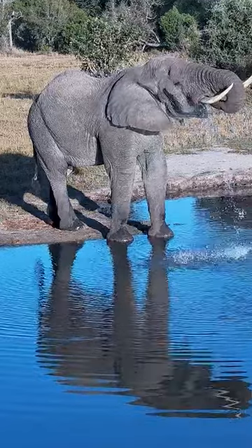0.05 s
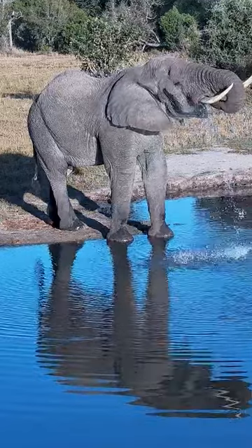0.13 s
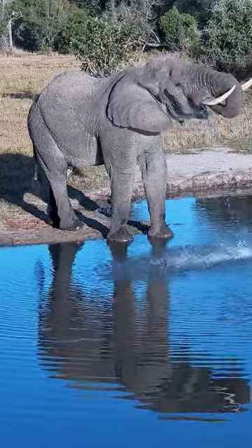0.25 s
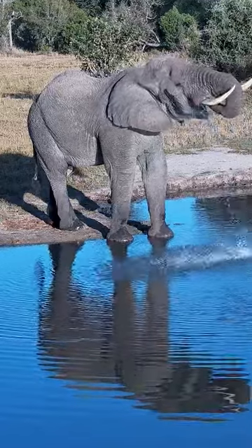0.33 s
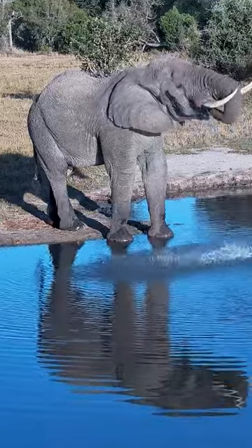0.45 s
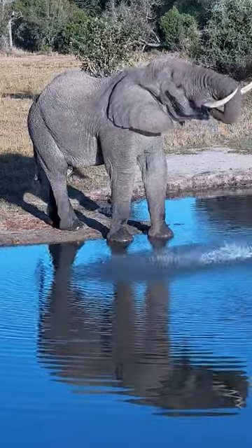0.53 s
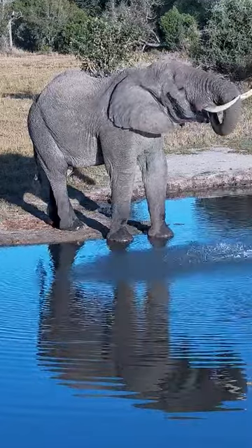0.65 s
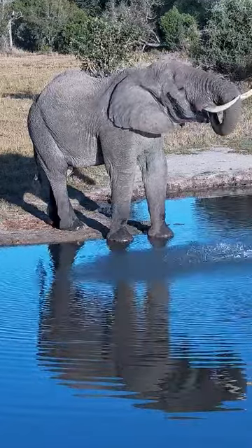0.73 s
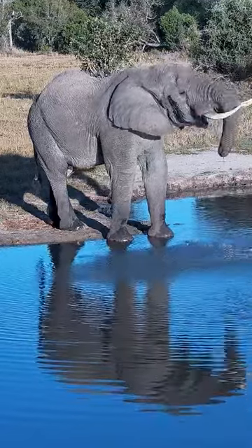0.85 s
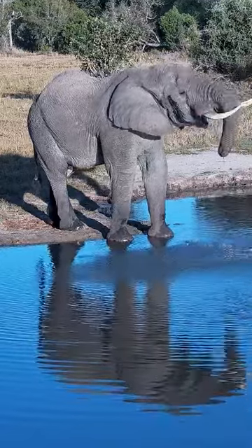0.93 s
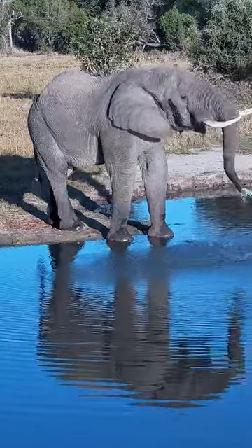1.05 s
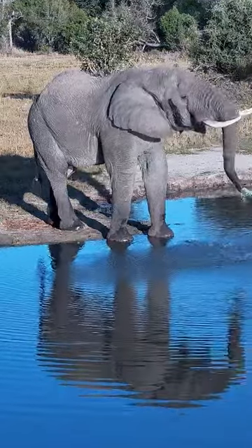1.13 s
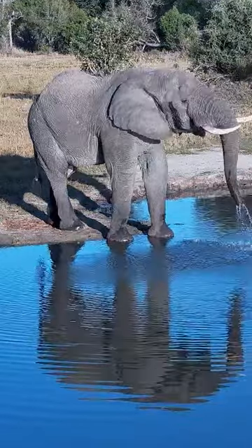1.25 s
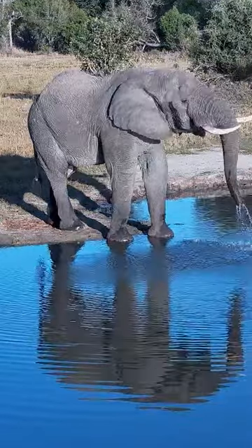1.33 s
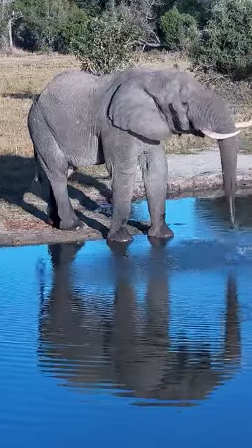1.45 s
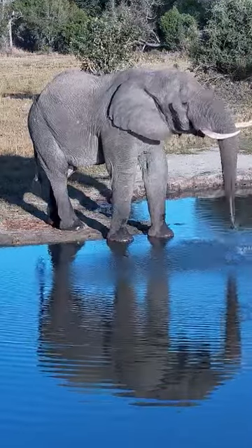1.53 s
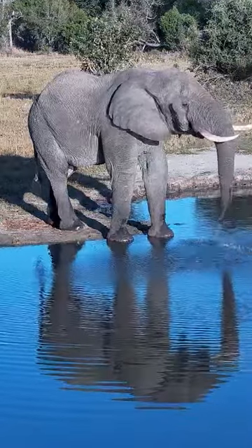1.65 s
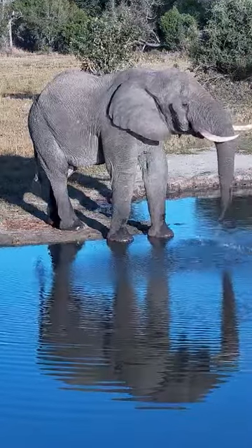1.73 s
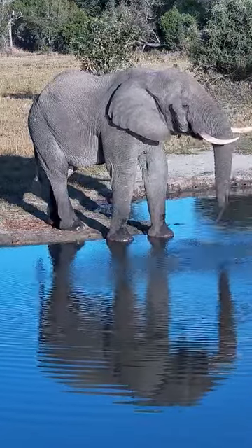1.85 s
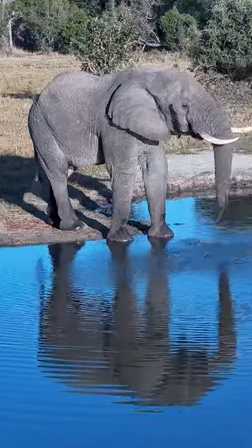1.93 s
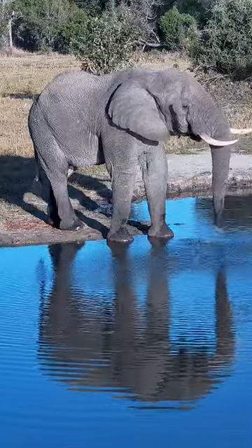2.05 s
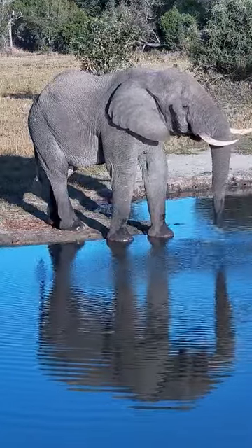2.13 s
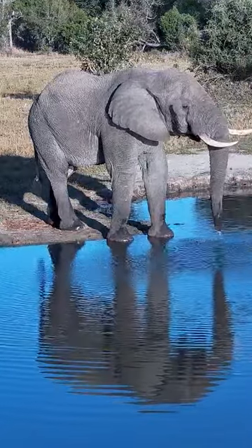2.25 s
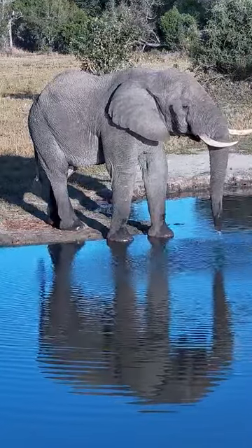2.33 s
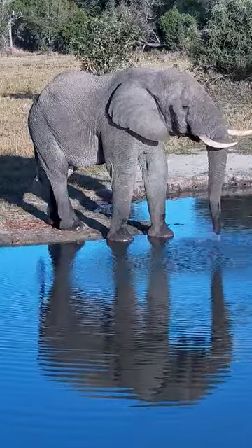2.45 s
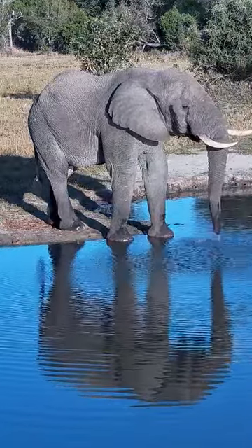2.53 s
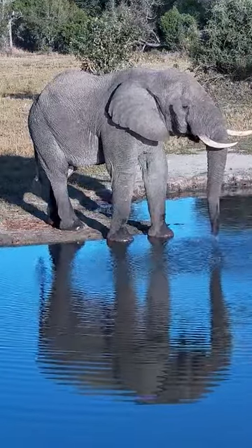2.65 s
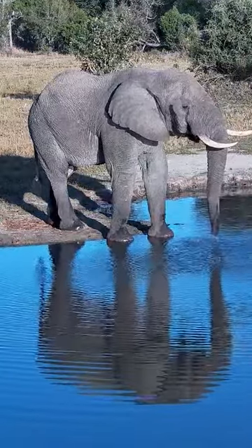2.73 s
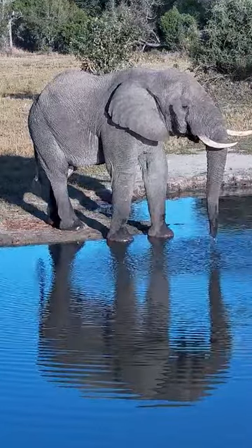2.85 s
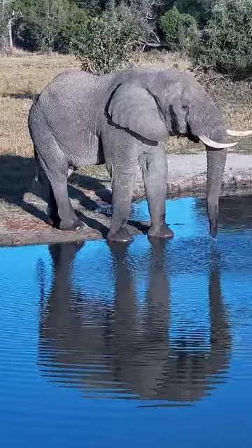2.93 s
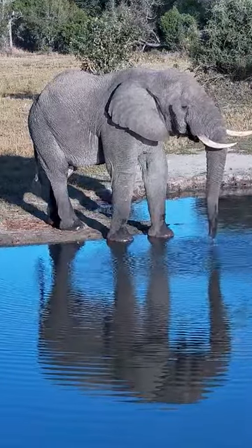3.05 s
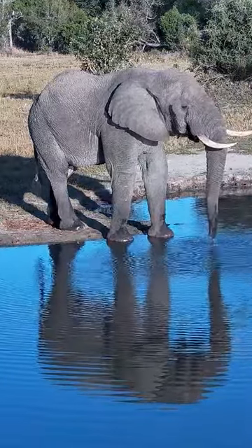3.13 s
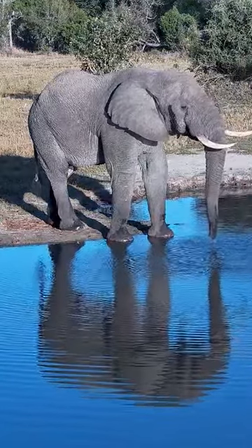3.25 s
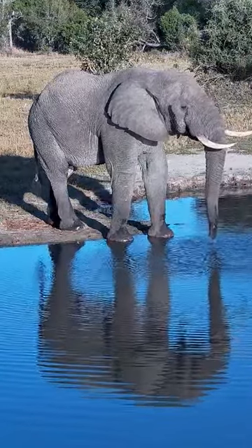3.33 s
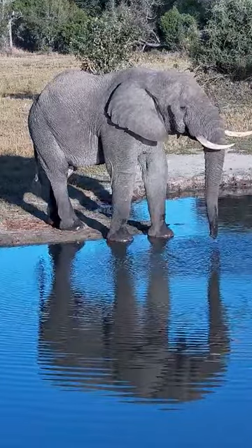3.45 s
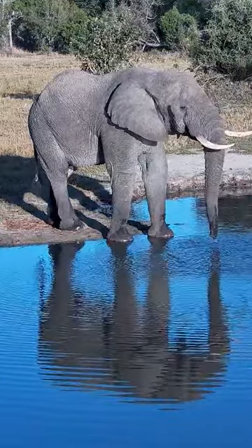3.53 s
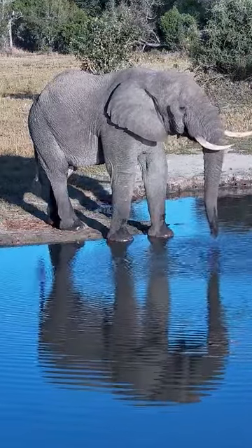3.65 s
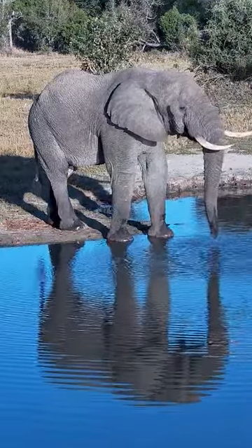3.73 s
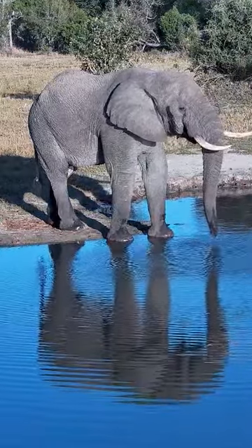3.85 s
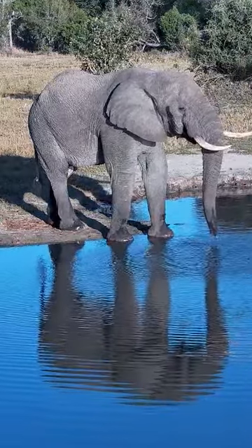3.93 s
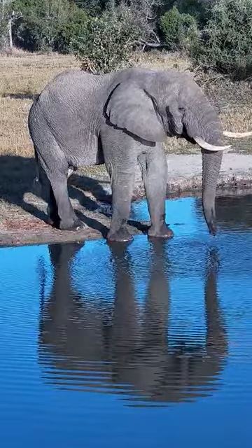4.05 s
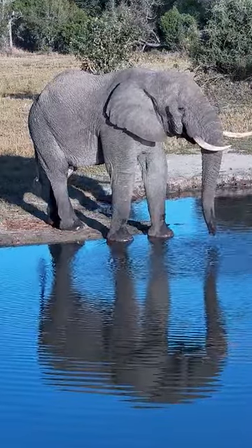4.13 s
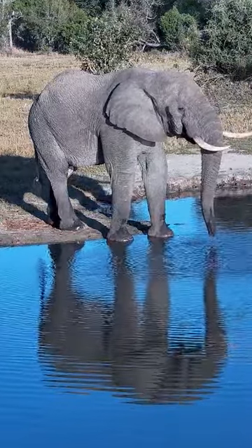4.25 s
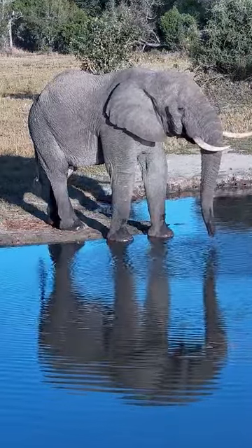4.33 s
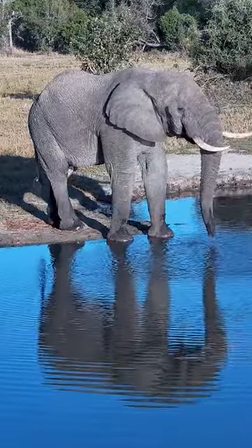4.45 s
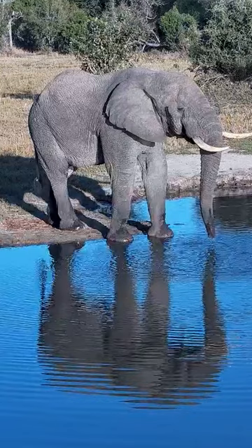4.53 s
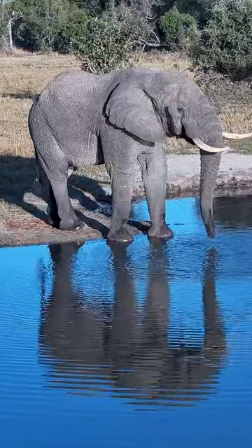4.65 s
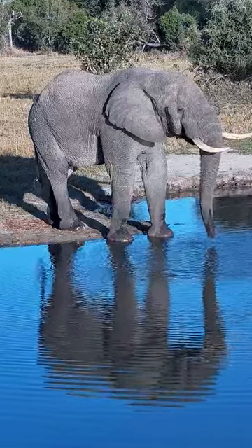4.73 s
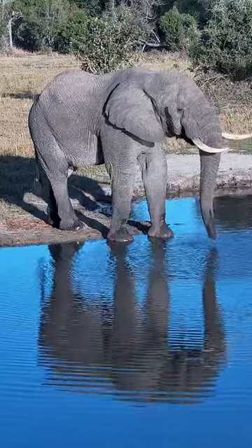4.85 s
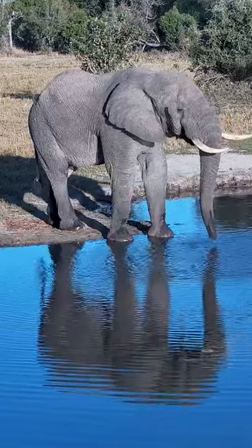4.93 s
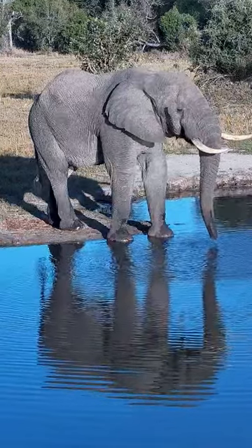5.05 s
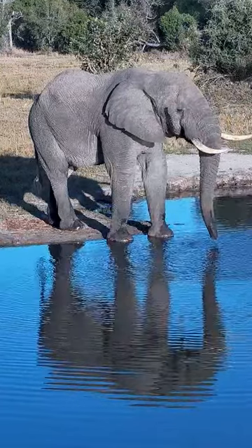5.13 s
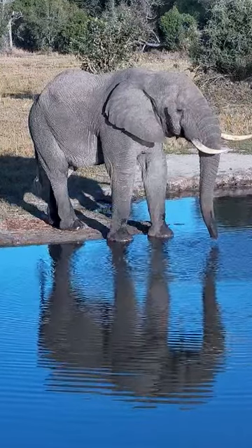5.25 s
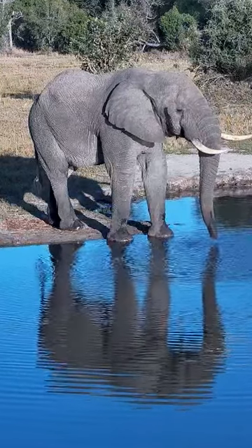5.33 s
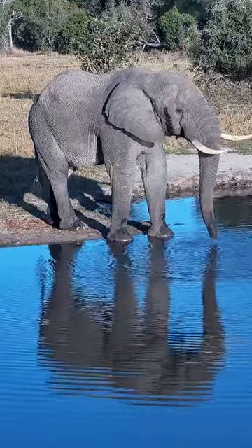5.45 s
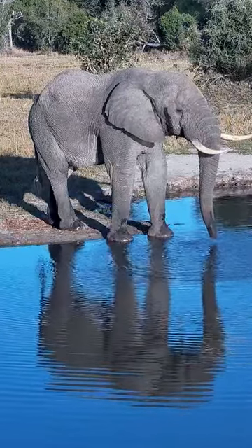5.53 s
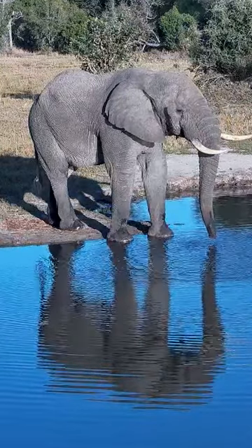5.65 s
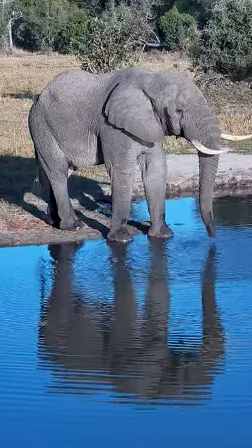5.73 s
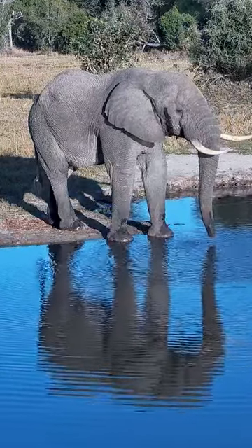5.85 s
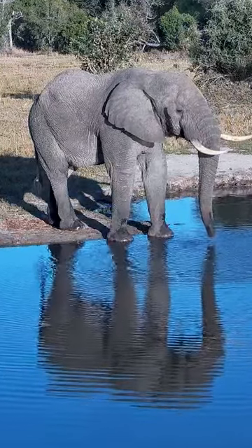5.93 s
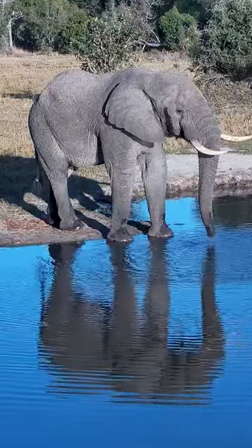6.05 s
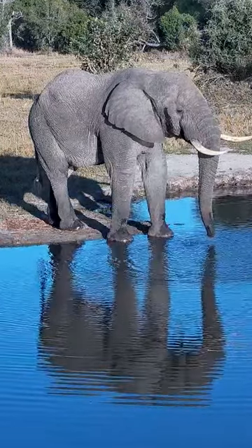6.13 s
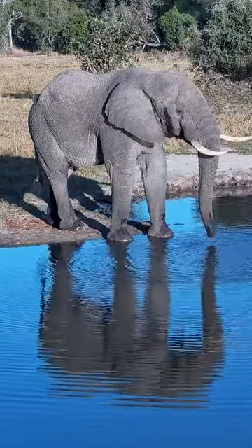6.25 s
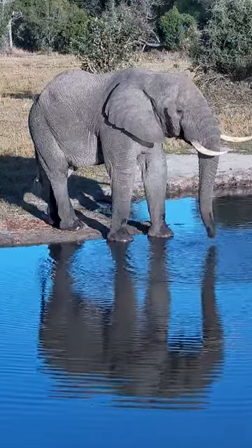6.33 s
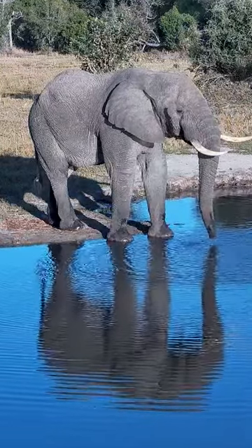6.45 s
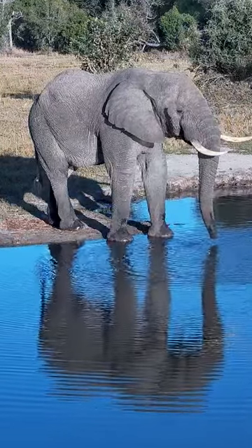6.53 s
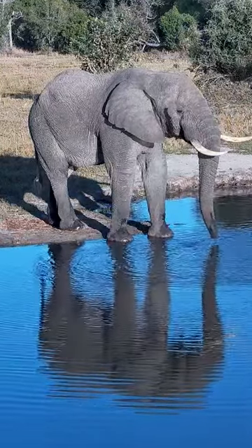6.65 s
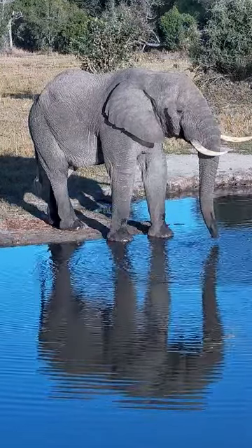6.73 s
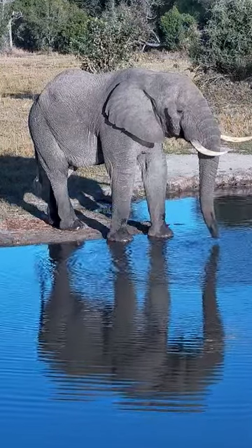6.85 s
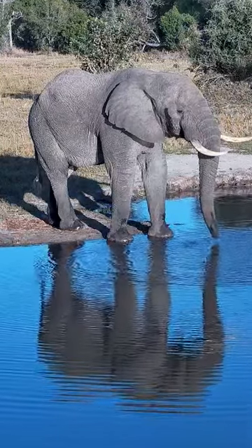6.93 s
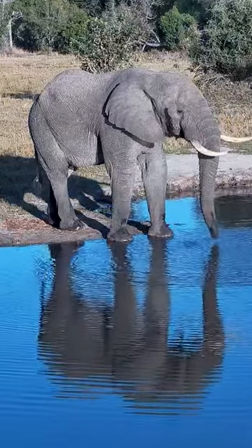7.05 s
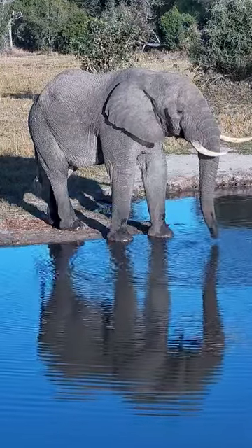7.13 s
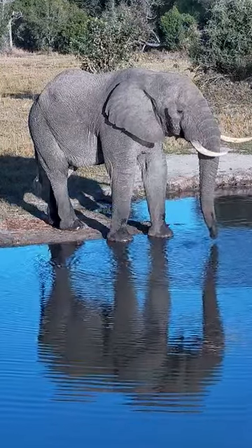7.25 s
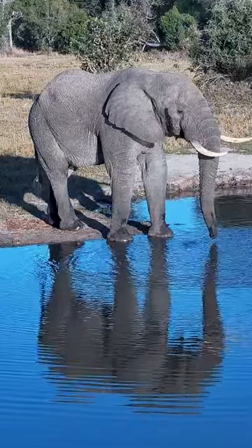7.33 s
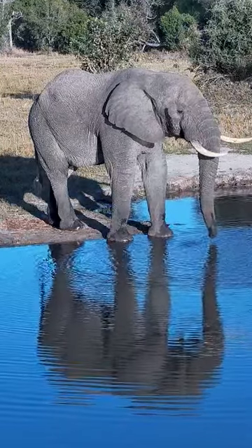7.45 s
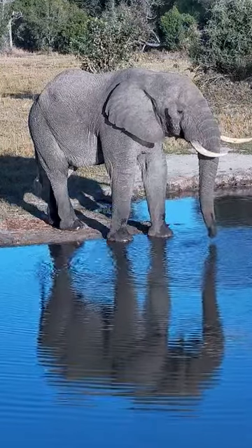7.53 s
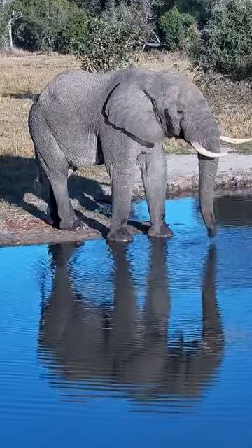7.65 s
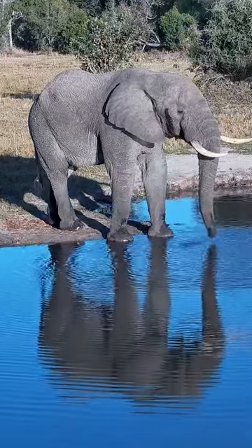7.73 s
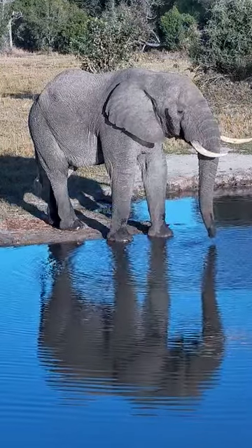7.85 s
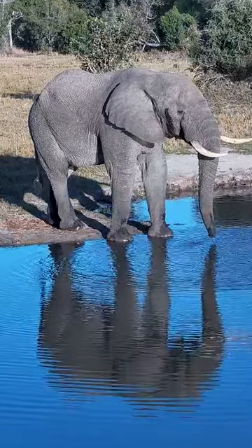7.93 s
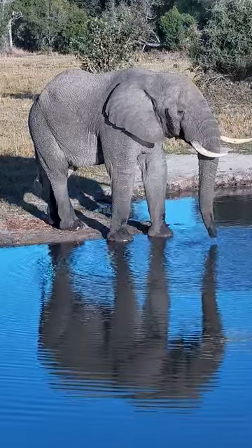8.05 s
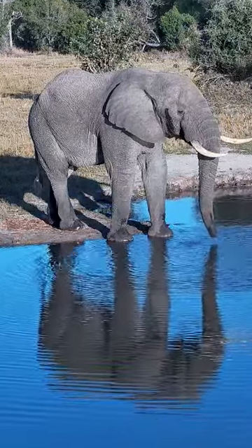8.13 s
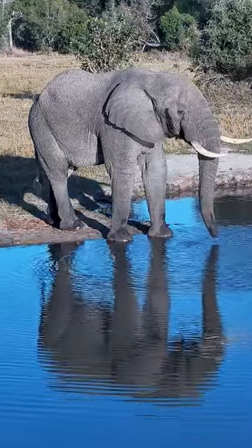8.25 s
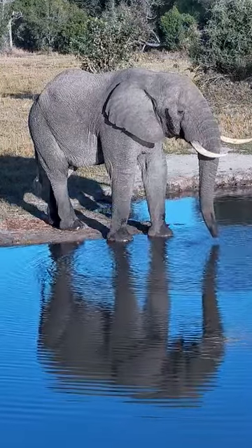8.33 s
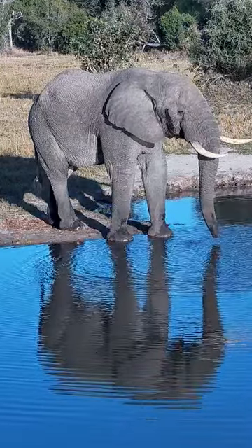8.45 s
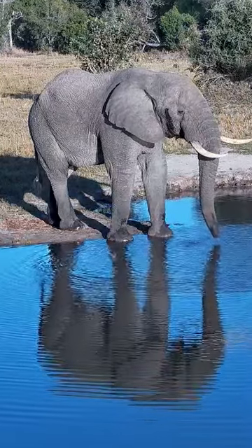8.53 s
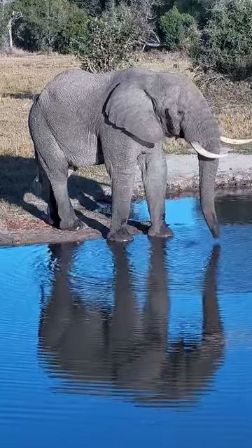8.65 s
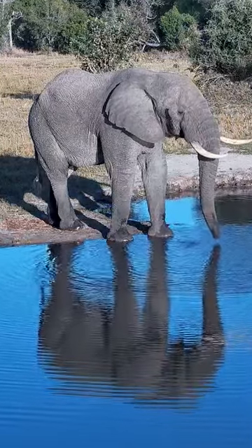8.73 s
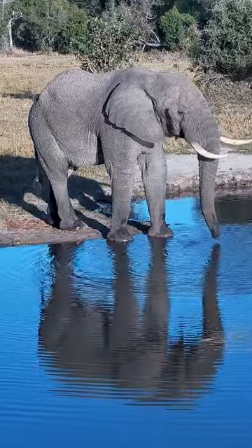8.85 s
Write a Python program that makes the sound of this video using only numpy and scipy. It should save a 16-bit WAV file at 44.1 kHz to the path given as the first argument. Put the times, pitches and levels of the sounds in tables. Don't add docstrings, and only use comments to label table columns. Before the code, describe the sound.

At a waterhole, a thick stream from an elephant's mouth pours with a hollow gurgling rush, then slaps and sprays brightly on the pond. It breaks into low plops and thins to trickle and drips. A second small splash follows, then a bird calls with nasal note, whistles, dry rattle, squeal, churr and chirp. Sparse drips and steady hiss remain, with a softer call late. Boxy, lo-fi microphone.

```python
import sys
import numpy as np
from scipy import signal
from scipy.fft import rfft, irfft, next_fast_len
from scipy.io import wavfile
from scipy.ndimage import uniform_filter1d, map_coordinates

SR = 44100
rng = np.random.default_rng(int(sys.argv[2]) if len(sys.argv) > 2 else 0)


def gain_from_db(level_db):
    decades = np.asarray(level_db, float) / 20
    return 10 ** decades


def generate_wav(sig):
    pcm = np.round(np.clip(np.atleast_2d(sig).T, -1, 1) * 32767).astype(np.int16)
    wavfile.write(sys.argv[1], SR, pcm)


N = 392490
T = np.arange(N) / SR


def unit(x):
    return x / np.sqrt(np.mean(x ** 2) + 1e-20)


def noise():
    return rng.standard_normal(N)


def add(track, start_s, x):
    part = track[round(start_s * SR):][:len(x)]
    part += x[:len(part)]


def filtered(x, response):
    n = x.shape[-1]
    m = next_fast_len(n + 2048)
    return irfft(rfft(x, m) * response(np.fft.rfftfreq(m, 1 / SR)), m)[..., :n]


def tilt(points):
    f, db = np.transpose(points)
    return lambda hz: gain_from_db(np.interp(np.log(hz + 1), np.log(f), db))


def wobble(rate):
    return map_coordinates(rng.standard_normal(N // 100), [T * rate])


def summed(*dbs):
    return 10 * np.log10(sum(gain_from_db(db) ** 2 for db in dbs))


# pitch_hz, width_hz, level_db
BOX = [(412, 168, -4.5), (627, 170, 0), (900, 170, -6.5), (1247, 175, -1), (1600, 277, 0.5),
       (2080, 850, -4), (3260, 367, 2.5), (3690, 430, 0), (4700, 910, -7), (6550, 1280, -13),
       (9600, 4400, -26)]


def box(f):
    total = 0
    for k, (hz, width, db) in enumerate(BOX):
        ring = 1j * f * width / (hz * hz - f * f + 1j * f * width)
        total = total + (-1) ** k * gain_from_db(db) * ring
    return total


def bubbles(hz, cycles, spread_db, count, size):
    when, wide = rng.random(count), rng.standard_normal(count)
    t = np.arange(size) / SR
    f = hz * np.exp(0.3455 * wide)[:, None]
    u = f * t / cycles
    grain = np.sin(2 * np.pi * f * t * (1 + 0.15 * u)) * np.exp(-2.5 * u) * (1 - np.exp(-8 * u))
    grain *= gain_from_db(spread_db * np.minimum(rng.exponential(size=(count, 1)), 3.5))
    at = (when * N).astype(int)[:, None] + np.arange(size)
    return unit(np.bincount(at.ravel(), grain.ravel(), N + size)[:N])


def layer(grains, share, colour, lumps_db):
    lumps = wobble(25) + 0.27 * wobble(6) + 1.8 * wobble(140)
    rush = noise() * gain_from_db(lumps_db * lumps)
    grains, rush = filtered(np.array([grains, rush]), lambda hz: box(hz) * tilt(colour)(hz))
    return unit(share * unit(grains) + unit(rush))


def pockets(modes, lumps_db):
    def sharp(f):
        return sum(gain_from_db(db) * (f * w / (c * c - f * f + 1j * f * w)) ** 2 for c, w, db in modes)
    return unit(filtered(noise() * gain_from_db(lumps_db * wobble(30)), sharp))


# pitch_hz, width_hz, level_db
CAVITY = [(618, 95, 4.5), (960, 190, 1.5), (1490, 340, 4), (1950, 440, -5)]


def stream(pour_db):
    return gain_from_db(pour_db) * pockets(CAVITY, lumps_db=2.5)


# pitch_hz, level_db
GURGLE = [(130, -33), (195, 4), (300, 2), (450, -9.5), (800, 0), (1100, -1.5), (2000, -21)]


def gurgle(level_db):
    grains = bubbles(586.0, 8.9, 4.7, count=1600, size=1000)
    return gain_from_db(level_db - 2.1) * layer(grains, 0.41, GURGLE, lumps_db=0.2)


# pitch_hz, level_db
PATTER = [(500, -32), (850, 0), (1150, -4), (1800, -2.5), (2500, -4), (3500, -0.5)]


def patter(level_db):
    grains = bubbles(1552, 9.5, 2.0, count=2400, size=400)
    return gain_from_db(level_db - 2.7) * layer(grains, 0.58, PATTER, lumps_db=1.58)


# pitch_hz, level_db
SPRAY = [(1200, -27), (2200, -2), (3000, 2.5), (5000, -2.5), (7000, -4.5), (9500, -17), (13000, -14)]


def spray(level_db):
    grains = bubbles(4000, 1.5, 4.3, count=9000, size=80)
    return gain_from_db(level_db + 0.23) * layer(grains, .9, SPRAY, lumps_db=1.5)


def mist(spray_db):
    fine = unit(filtered(noise(), lambda hz: np.clip((hz - 6000) / 2500, 0, 1) * (hz < 13000)))
    return gain_from_db(2.1 * (spray_db + 31) - 65.5) * fine


# pitch_hz, width_hz, level_db
RILL = [(1170, 61, 0), (1623, 54, -1.5), (3680, 76, -3)]


def trickle(patter_db):
    return gain_from_db(np.minimum(patter_db, -50) - 8.0) * pockets(RILL, lumps_db=2.5)


# time_s, level_db
POUR = [
    (0, -34),
    (.2, -37.5),
    (.45, -36.5),
    (.7, -37.5),
    (.95, -39.5),
    (1.13, -49.5),
    (1.22, -58),
    (1.39, -61),
    (1.48, -83),
]
# time_s, spray_level_db
FORCE = [(0, -41), (.43, -40.5), (.6, -33), (.8, -31.5), (.88, -32.5), (1.07, -40), (1.22, -48), (1.5, -55),
         (1.8, -50.5), (1.84, -37.5), (1.9, -36.5), (2.01, -44.5), (2.15, -48.5), (2.6, -54), (2.83, -45.5),
         (3.1, -55), (3.58, -54.5), (3.76, -60)]
# level_db at 3 s, loss_db per second
RUNOFF = [
    (-51.5, 1.1),
    (-58.5, 0.52),
]


def water():
    pour_db = np.interp(T, *np.transpose(POUR))
    after_last_s = np.maximum(T - FORCE[-1][0], 0)
    spray_db = np.interp(T, *np.transpose(FORCE)) - 2.7 * after_last_s
    thin_db, thick_db = [db - loss * (T - 3) for db, loss in RUNOFF]
    splash_patter_db = 0.89 * (spray_db + 37) - 34.5 - 1
    splash_gurgle_db = 0.26 * (spray_db + 33.5) - 34.5 - 20
    patter_db = summed(splash_patter_db, pour_db - 25, thin_db)
    gurgle_db = summed(splash_gurgle_db, pour_db + 1, thick_db)
    running = stream(pour_db) + gurgle(gurgle_db) + patter(patter_db)
    return running + spray(spray_db) + mist(spray_db) + trickle(patter_db)


# start_s, peak_db, bubble_hz, bubble_db
DROPS = [(0.538, -15, 3080, -15), (0.6162, -5, 3460, -25), (1.196, -33, 3600, 6), (1.235, -25, 1550, 2),
         (1.474, -38, 2470, 6), (1.538, -41, 4220, 6), (1.593, -34, 2120, -1), (1.623, -35, 3770, 12.5),
         (1.701, -36.5, 1040, 0), (1.72, -39, 1550, -10), (2.185, -31.5, 3200, 9.5), (2.6484, -37, 1110, 4),
         (2.8196, -18, 2150, -2), (3.237, -37, 3180, 6), (3.419, -38.5, 3740, 11), (3.445, -38, 3400, 6),
         (3.465, -41, 3350, 8), (3.556, -38, 3460, 6), (3.6, -38, 3300, 7), (3.939, -26.5, 1290, -4),
         (4.041, -35, 1270, 1), (4.117, -44, 3900, 17), (4.875, -35.5, 3770, 7), (5.721, -41, 1250, 2),
         (6.753, -42.5, 1300, 13.5), (7.11, -40, 1600, 11), (8.35, -43.5, 720, 2)]
# start_s, peak_db
TICKS = [(0.654, -10), (.7375, -16), (1.267, -25), (1.347, -24), (1.409, -24.5), (1.453, -28), (1.554, -32),
         (1.581, -28), (2.172, -34), (2.8198, -20), (3.405, -35), (5.09, -34), (5.868, -36), (2.063, -25),
         (2.116, -23), (3.644, -35), (0.4348, -23), (3.329, -30), (3.548, -32), (3.592, -27), (4.398, -32),
         (4.46, -34), (5.435, -35), (5.861, -35), (6.691, -38), (8.4, -41)]


def drops():
    out = np.zeros(N)
    t = np.arange(2010) / SR
    small = [(s, db, 3350, -21) for s, db in TICKS]
    for s, db, hz, bubble_db in DROPS + small:
        def colour(f):
            return box(f) / (1 + (f / hz / 2.4) ** 4) / (1 + (hz / 1.23 / (f + 1)) ** 4)
        tick = filtered(np.exp(-t / .00004), colour)
        ring = np.sin(2 * np.pi * hz * t * (1 + 4 * t))
        ring *= np.exp(-t * hz / 4.2) * (1 - np.exp(-t / 0.000064))
        add(out, s, gain_from_db(db - 3.5) * (tick / abs(tick).max() + gain_from_db(bubble_db) * ring))
    return out


def puffs(rows, colour, noisy, rise, gain_db):
    out = np.zeros(N)
    roughs = unit(filtered(rng.standard_normal((len(rows), SR // 32)), colour))
    for (s, length, db, hz), rough in zip(rows, roughs):
        u = np.arange(0, 1.7, 1 / (length * SR))
        cycles = hz * length * (u + rise * (u * u / 2 - u))
        tone = np.sin(2 * np.pi * (cycles + rng.random()))
        swell = abs(np.sin(np.pi * (u / 1.69) ** 0.65)) ** 0.79
        add(out, s - .2 * length, gain_from_db(db + gain_db) * swell * (tone + noisy * rough[:len(u)]))
    return out


# start_s, length_s, peak_db, ring_hz
SLAPS = [(0.5136, 0.0031, -21.6, 3260), (0.5183, 0.0026, -26, 3300), (0.5217, 0.0028, -16.5, 3100),
         (0.5384, 0.0024, -16.1, 3220), (0.544, 0.0033, -18.5, 3200), (0.5608, 0.0026, -27, 3150),
         (0.5887, 0.0037, -21, 3170), (0.5977, 0.003, -16.0, 3270), (0.601, 0.0036, -18.5, 3370),
         (0.616, 0.0016, -15, 3920), (0.6215, 0.002, -25, 3690), (0.6528, 0.0022, -20, 3410),
         (0.6611, 0.002, -26, 3300), (0.6674, 0.0022, -19, 3320), (0.6744, 0.0018, -15, 3700),
         (0.6798, 0.002, -22, 3600), (0.682, 0.0022, -23, 3600), (0.738, 0.0014, -20, 3080),
         (0.7652, 0.0031, -16.9, 3280), (0.7683, 0.0024, -18, 3480), (0.7759, 0.003, -19.0, 3300),
         (0.7796, 0.0026, -16.9, 3830), (0.7938, 0.002, -19, 3110), (0.798, 0.0023, -20, 3260),
         (0.801, 0.0017, -19, 3400), (0.8302, 0.0041, -27, 3360), (0.8637, 0.0017, -21, 3430),
         (0.8715, 0.0021, -23, 3350), (0.8861, 0.0029, -19, 3550), (0.9014, 0.0022, -21.5, 3420),
         (0.9227, 0.0016, -26.1, 3500), (0.9258, 0.0021, -33, 3390), (0.9578, 0.0017, -27.5, 3260),
         (0.9669, 0.002, -27, 3880), (0.9773, 0.0041, -31, 3340), (0.9854, 0.0024, -23.5, 3460),
         (0.9999, 0.0044, -29, 3380), (1.0074, 0.0019, -25, 3260), (1.0267, 0.0017, -30, 3150),
         (1.8612, 0.0021, -34, 3260), (1.8648, 0.002, -29, 3430), (1.8778, 0.0018, -31, 3360),
         (1.8805, 0.0023, -35, 3420), (1.884, 0.0022, -23, 3260), (1.8902, 0.0027, -25, 3300),
         (1.9023, 0.0031, -33, 3460), (1.909, 0.0017, -30, 3400), (1.9123, 0.002, -31, 3450),
         (1.9407, 0.0027, -28, 3190), (1.9715, 0.0017, -25, 3500),
         (0.717, 0.0037, -25, 3520), (0.725, .004, -26, 3280), (0.747, 0.0041, -22, 3300),
           (0.756, 0.0039, -22, 3500), (.5925, 0.0039, -17, 3240), (.857, 0.0027, -24, 3320),
           (0.8926, 0.0038, -23, 3400), (.897, .003, -22.5, 3320), (0.906, .002, -22, 3500),
           (.6, 0.0032, -23, 1900), (0.613, 0.0032, -20, 1690), (0.884, 0.0038, -27, 1490)]


def slaps():
    def bright(hz):
        return box(hz) * hz ** 2 / (hz ** 2 + 2200 ** 2) / (1 + (hz / 5400) ** 4)
    return puffs(SLAPS, bright, noisy=0.7, rise=.02, gain_db=-3.5)


# start_s, length_s, start_hz, end_hz,
# level_db
GLUGS = [(1.459, 0.029, 720, 1070, -48), (1.694, 0.033, 838, 1300, -59), (3.416, 0.014, 580, 830, -44.5),
         (3.9, 0.032, 760, 2100, -49), (7.017, 0.044, 630, 790, -50), (2, 0.053, 832, 1720, -45),
         (2.673, 0.026, 630, 1140, -40), (2.921, 0.088, 570, 1430, -45.5), (2.989, 0.014, 710, 1600, -38),
         (3.12, 0.027, 970, 2200, -41), (3.948, 0.016, 1150, 1350, -38.5), (5.644, 0.035, 600, 1240, -54),
         (3.49, 0.09, 3730, 3700, -47.5), (5.291, 0.017, 1600, 2400, -44.5),
         (3.682, 0.0123, 960, 2050, -35.5), (0.59, 0.016, 900, 1500, -46), (1.475, 0.043, 396, 480, -53),
         (6.4, 0.03, 1700, 710, -60)]


def glugs():
    out = np.zeros(N)
    for s, length, hz0, hz1, db in GLUGS:
        u = np.arange(int(length * SR)) / (length * SR)
        tone = np.sin(2 * np.pi * np.cumsum(hz0 * (hz1 / hz0) ** u) / SR)
        waver_db = 4.5 * np.sin(40 * s + 13 * u)
        add(out, s, gain_from_db(db - 3.0 + waver_db) * np.sin(np.pi * u) ** 0.099 * tone)
    return out


# start_s, length_s, peak_db, pitch_hz
PLOPS = [
    (1.0874, 0.0066, -31.5, 1350),
    (1.1147, 0.0085, -31.4, 1180),
    (1.1265, 0.0088, -33, 1285),
    (1.1337, 0.0068, -30.5, 1450),
    (1.1415, 0.0068, -38, 1650),
    (1.2732, 0.006, -40.8, 1140),
    (1.2845, 0.0097, -45, 1320),
    (1.302, 0.0048, -39.6, 1600),
    (1.3571, 0.0058, -39, 1340),
    (1.3787, 0.0112, -39.6, 1490),
]


def plops():
    return puffs(PLOPS, lambda hz: box(hz) * (hz < 2300), noisy=0.61, rise=0.089, gain_db=-5.5)


def notes(rows, rule, flutter_db):
    out, flutter = np.zeros(N), wobble(220)
    for s, length, *rest in rows:
        t = np.arange(0, length, 1 / SR)
        hz, levels = rule(t / length, t, *rest)
        phase = 2 * np.pi * np.cumsum(hz * (1 + 0.0081 * flutter[:len(t)])) / SR
        edge = np.clip(np.minimum(t, length - t) / 0.0018, 0, 1)
        tone = sum(gain_from_db(db + 3) * np.sin((k + 1) * phase + k) for k, db in enumerate(levels))
        add(out, s, edge * tone * gain_from_db(flutter_db * flutter[round(s * SR):][:len(t)]))
    return out


OPEN_DB = [-17, -8, -5, -9, -0.5, -16]
CLOSED_DB = [-15, 0, -9, -20, -30, -45]


def nasal(u, t, hz, db, closing):
    shut = closing * np.tanh((t / .033) ** 2)
    crack = (t - .022 - .014 * closing) / .006
    db = db - 13 * closing * u ** 2
    sag = (.012 + .08 * closing) * u
    step = .024 * (1 + np.tanh(crack)) / 2
    levels = []
    for k, (wide_db, shut_db) in enumerate(zip(OPEN_DB, CLOSED_DB)):
        dropout_db = 16 * (k > 1) * np.exp(-crack ** 2)
        levels.append(db + wide_db + (shut_db - wide_db) * shut - dropout_db)
    return hz * (1 - sag - step), levels


# start_s, length_s, pitch_hz, level_db, beak_closing from 0 to 1
NASAL = [
    (2.228, 0.096, 878, -45, 0.1),
    (7.405, .102, 857, -44, 0.94),
]


def nasal_notes():
    return notes(NASAL, nasal, flutter_db=1.7)


def glide(reach, bend, peak, rise_db, fall_db, purr_db, partials_db):
    def rule(u, t, hz0, hz1, db):
        early = np.maximum(1 - u / peak, 0)
        late = np.maximum((u - peak) / (1 - peak), 0)
        purr = np.cos(np.pi * 218 * t) ** 4
        db = db - rise_db * early - fall_db * late - purr_db * early ** 0.35 * purr
        hz = hz0 + (hz1 - hz0) * (1 - np.maximum(1 - u / reach, 0) ** bend)
        return hz, [db + p for p in partials_db]
    return rule


# start_s, length_s, start_hz, end_hz, level_db
WHISTLE = [
    (2.36, 0.057, 1390, 1306, -54),
    (2.47, 0.073, 1746, 1960, -49),
]


def whistles():
    return notes(WHISTLE, glide(0.46, 1.8, .65, 4.6, 11, 3, [0, -13, -35]), flutter_db=1.7)


def throat(hz):
    return box(hz) * (hz > 1500) * (hz < 5300)


# start_s, length_s, peak_db, pitch_hz
RATTLE = [(2.4691, 0.0016, -31.9, 3400), (2.4746, 0.0027, -29.7, 3540), (2.4856, 0.003, -27, 3680),
          (2.4888, 0.0016, -29, 3530), (2.4984, 0.0015, -23, 3500), (2.5002, 0.0016, -30, 3560),
          (2.5071, 0.0022, -24, 3690), (2.5114, 0.0019, -29.8, 3550), (2.519, 0.0033, -22, 3770),
          (2.5245, 0.0023, -28, 3600), (2.5295, 0.0018, -30, 3440), (2.5319, 0.002, -22.5, 3700),
          (2.5351, 0.0017, -25, 3600), (2.5566, 0.0017, -22, 3900), (2.5586, 0.0017, -31, 3490),
          (2.5603, 0.0047, -26.3, 3290), (2.5652, 0.004, -29, 3280), (2.574, 0.0015, -39, 3240),
          (2.7177, 0.0027, -32, 4000), (2.7213, 0.0021, -34.0, 3500), (2.7261, 0.0026, -32, 3580),
          (2.7297, 0.0017, -32, 3550), (2.7475, 0.0016, -19, 3360), (2.7495, 0.0034, -21.5, 3470),
          (2.7545, 0.0028, -17.5, 3680), (2.7577, 0.0025, -20.1, 3640), (2.7639, 0.0023, -37, 3200),
          (2.7666, 0.0012, -35, 3440), (2.7789, 0.0028, -20, 3680), (2.7834, 0.0025, -19.5, 3830),
          (2.7972, 0.0032, -25, 3670), (2.8016, 0.0012, -24.0, 3580), (2.8111, 0.0024, -30, 3760),
          (2.9622, 0.0027, -39, 3430), (2.9669, 0.002, -41, 3390), (2.9697, 0.0015, -43.0, 3460),
          (2.9749, 0.0014, -42.9, 3630), (2.9783, 0.0017, -47, 3340), (2.9867, 0.0017, -44, 3340),
          (2.9999, 0.0026, -43, 3160), (3.0051, 0.0026, -31.6, 3450), (3.0116, 0.0019, -30.4, 3450),
          (3.0146, 0.0015, -31, 3540), (3.0163, 0.0017, -33, 3270), (3.0232, 0.0025, -41.6, 3390),
          (2.4548, .003, -46, 3320),
    (2.541, .003, -34, 3850),
    (2.575, .005, -34, 3300),
    (2.836, 0.0045, -26, 3700),
    (2.842, 0.0044, -25, 3800),
    (7.403, .005, -46, 3660),
]


def rattle():
    return puffs(RATTLE, throat, noisy=0.23, rise=.07, gain_db=-0.7)


# start_s, length_s, level_db
RASP = [
    (2.484, 0.075, -54),
    (2.72, 0.059, -48),
    (2.818, .06, -60),
    (3.047, 0.053, -48),
    (7.67, 0.065, -52),
]


def rasp():
    out = np.zeros(N)
    rough = filtered(noise(), lambda hz: np.exp(-((hz - 2050) / 550) ** 2))
    breath = unit(rough * gain_from_db(3.1 * wobble(150)))
    for s, length, db in RASP:
        outside_s = np.maximum(np.maximum(s - T, T - s - length), 0)
        out += gain_from_db(db - 502 * outside_s) * breath
    return out


# start_s, length_s, start_hz, end_hz, level_db
SQUEAL = [
    (2.822, .051, 1826, 2180, -29),
    (2.874, 0.019, 2160, 2260, -43),
]


def squeals():
    return notes(SQUEAL, glide(1.05, 1.07, 0.67, 2.5, 7, 22, [-14, 1.5, -25, -29]), flutter_db=3.5)


# start_s, length_s, peak_db, pitch_hz
CHURR = [(3.0458, 0.0031, -40, 3450), (3.0552, 0.0017, -39.3, 3510), (3.0571, 0.0018, -39.8, 3360),
         (3.0604, 0.0045, -39, 3320), (3.0652, 0.0019, -36.7, 3360), (3.0745, 0.0022, -35, 3220),
         (3.0777, 0.0031, -40.9, 3480), (3.0808, 0.0025, -39.4, 3570), (3.1003, 0.0039, -41, 3370),
         (3.1054, 0.0025, -43, 3450), (3.1153, 0.0028, -42, 3500), (7.3175, 0.0046, -43, 3670),
         (7.3427, 0.0032, -42, 3330), (7.6706, 0.0027, -41, 3400), (7.686, 0.0028, -35.2, 3400),
         (7.6888, 0.002, -35, 3300), (7.6971, 0.0028, -36.7, 3330), (7.6998, 0.0022, -38, 3380),
         (7.7084, 0.0032, -37, 3330), (7.7118, 0.0032, -37.2, 3320), (7.7411, 0.0029, -36, 3360),
         (7.7452, 0.0038, -36.9, 3300), (7.7509, 0.0029, -39.1, 3340), (7.7585, 0.004, -41.8, 3370)]
# start_s, length_s, peak_db, pitch_hz
CHURR_LOW = [(3.042, 0.0077, -33.5, 1640), (3.0535, 0.0068, -35.5, 1890), (3.0621, 0.0034, -34, 2320),
             (3.0777, 0.0027, -33.9, 1950), (3.0809, 0.0061, -46, 1870), (3.0916, 0.0065, -45, 1950),
             (7.6407, 0.0037, -50, 1710), (7.651, 0.003, -45.7, 1870), (7.6539, 0.0021, -42, 1540),
             (7.6666, 0.0032, -42, 1900), (7.6739, 0.0044, -43, 1940), (7.6841, 0.0076, -41, 1680),
             (7.6958, 0.0048, -41.8, 1750), (7.7003, 0.0033, -41.8, 1770), (7.7087, 0.0061, -40, 1680),
             (7.7154, 0.0085, -45, 1880), (7.7257, 0.0029, -46.3, 1870), (7.7313, 0.003, -46.8, 1660),
             (7.7342, 0.0029, -46.1, 2000), (7.7418, 0.0039, -39, 2270)]


def churr():
    upper = puffs(CHURR, throat, noisy=0.37, rise=.03, gain_db=-2.0)
    return upper + puffs(CHURR_LOW, throat, noisy=0.37, rise=0.034, gain_db=-2.5)


# start_s, length_s, start_hz, end_hz, level_db
CHIRP = [
    (3.149, 0.045, 1750, 2206, -37.5),
]


def chirp():
    return notes(CHIRP, glide(0.36, 3.5, 0.61, 7.7, 16, 1.5, [0, -15, -35]), flutter_db=.8)


# start_s, length_s, start_hz, end_hz, level_db
MURMUR = [
    (7.52, 0.115, 1402, 1295, -57),
]


def murmur():
    return notes(MURMUR, glide(0.62, 1.47, .4, 3, 5, 4, [0, -12, -35]), flutter_db=5.5)


def bank_echo(call):
    echo = rng.standard_normal(SR // 4) * gain_from_db(-60 * T[:SR // 4] / 0.063)
    late = np.pad(call, (300, 0))
    return gain_from_db(-13) * signal.fftconvolve(late, echo / np.linalg.norm(echo))[:N]


def bird():
    call = nasal_notes() + whistles() + rattle() + rasp() + squeals() + churr() + chirp() + murmur()
    return call + bank_echo(call)


def scene():
    splashes = drops() + slaps() + glugs() + plops()
    return (water() + splashes + bird())[None]


# pitch_hz, level_db
HISS = [(20, 9.5), (60, 6.5), (120, 3.5), (300, -1.5), (1000, 1.5), (4000, -2), (8000, -1.5), (12000, -1),
        (13000, -60)]


def hiss():
    return gain_from_db(-56.5) * unit(filtered(noise(), lambda hz: tilt(HISS)(hz) * (hz < 13000)))


# pitch_hz, margin_db
STARVED = [(80, 50), (140, 14), (300, 1), (500, 4.5), (2500, 9), (3200, 1.5), (5250, 15), (5600, 3.5),
           (6100, 1.5), (12000, 3.5)]
# start_s, length_s
GAPS = [(.464, 0.054), (.534, 0.097), (0.637, 0.056), (0.805, .063), (1.277, 0.11), (1.475, .025),
        (1.601, .027), (1.76, .04), (2.14, .035), (2.197, .05), (.98, 0.018), (2.39, .025), (2.547, .04),
        (2.636, .056), (2.743, 0.093), (3.03, 0.027), (3.32, .04), (3.41, .04), (3.652, .04), (3.92, .03),
        (6.8, .05)]
# start_s, length_s, above_hz
DULL = [
    (.51, .055, 10600),
    (0.64, 0.011, 9600),
    (.965, 0.017, 10400),
]


def drop_out(x):
    hz, t, z = signal.stft(x, SR, nperseg=1024, noverlap=768)
    power = uniform_filter1d(uniform_filter1d(abs(z) ** 2, size=3, axis=0), size=4, axis=1)
    level_db = 10 * np.log10(abs(power) + 1e-20)
    margin_db = np.interp(hz, *np.transpose(STARVED))[:, None]
    shortfall_db = uniform_filter1d(level_db, size=25, axis=0) - margin_db - level_db
    change_db = -14 * np.clip(shortfall_db / 3 + .5, 0, 1)

    def window(s, length):
        return np.clip(np.minimum(t - s, s + length - t) / 0.0061 + .5, 0, 1)

    gap_band = ((hz > 5390) & (hz < 5950))[:, None]
    change_db += gap_band * sum(-38 * window(s, length) for s, length in GAPS)
    for s, length, top_hz in DULL:
        change_db += -30 * (hz > top_hz)[:, None] * window(s, length)
    return signal.istft(z * gain_from_db(change_db), SR, nperseg=1024, noverlap=768)[1][:N]


def band_limit(x):
    return signal.sosfilt(signal.butter(12, 13020, fs=SR, output="sos"), x)


def record(dry):
    sent = drop_out(dry[0] + hiss())
    mix = filtered(sent, lambda hz: hz < 12330)[None]
    return band_limit(mix)


dry = scene()
out = record(dry)
generate_wav(out)
```